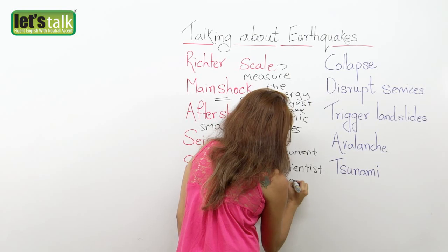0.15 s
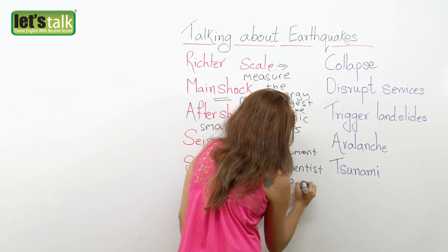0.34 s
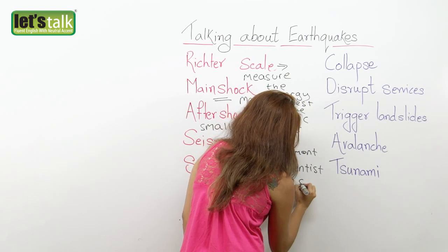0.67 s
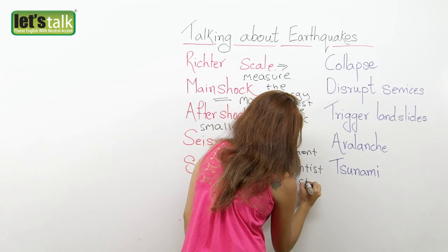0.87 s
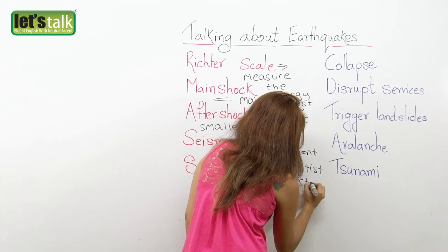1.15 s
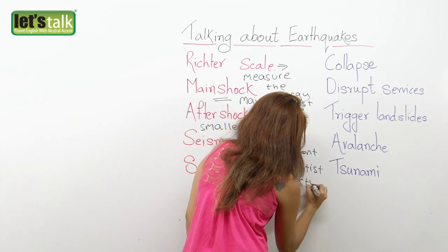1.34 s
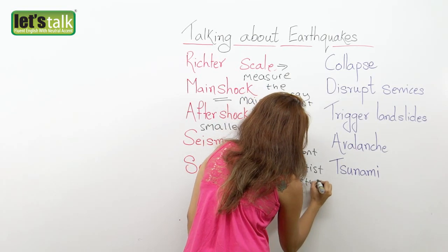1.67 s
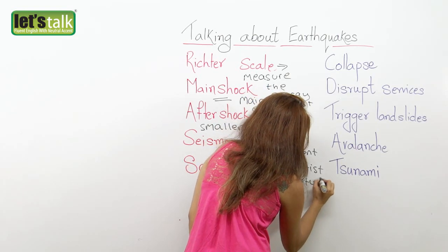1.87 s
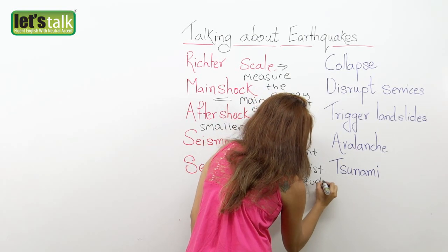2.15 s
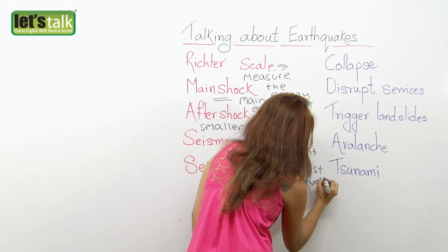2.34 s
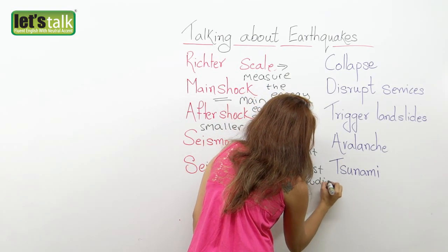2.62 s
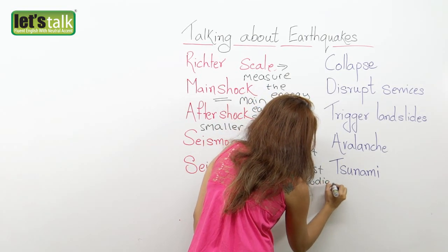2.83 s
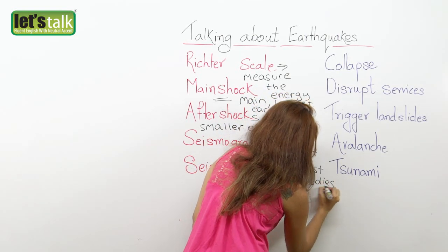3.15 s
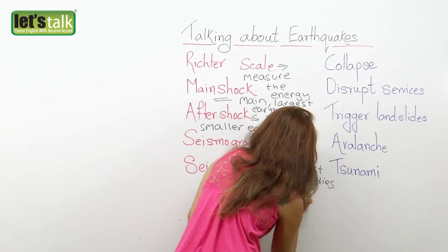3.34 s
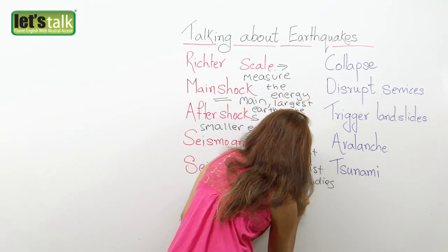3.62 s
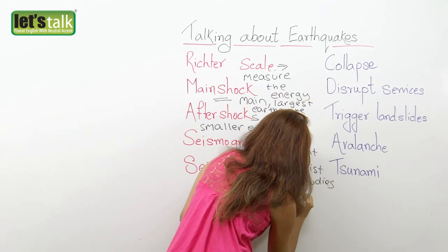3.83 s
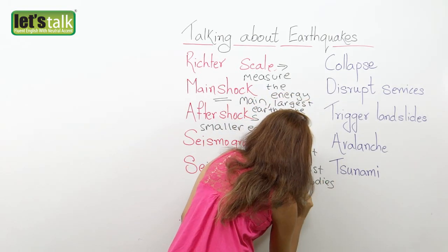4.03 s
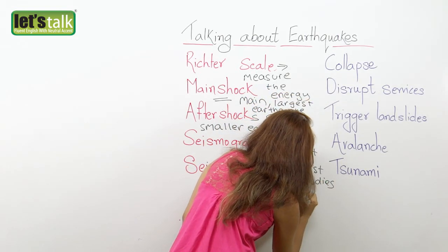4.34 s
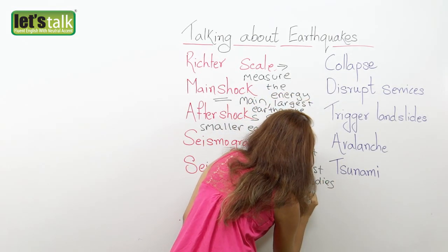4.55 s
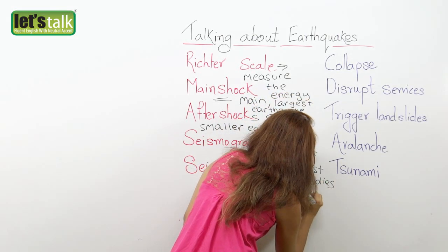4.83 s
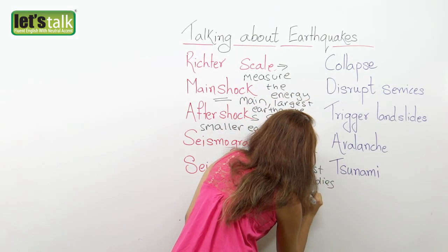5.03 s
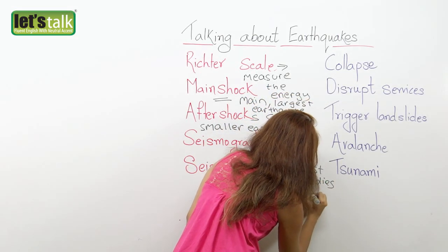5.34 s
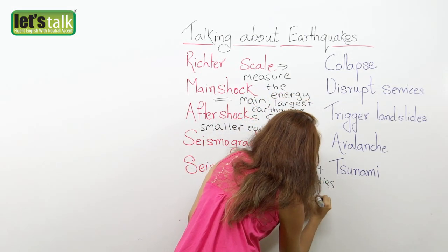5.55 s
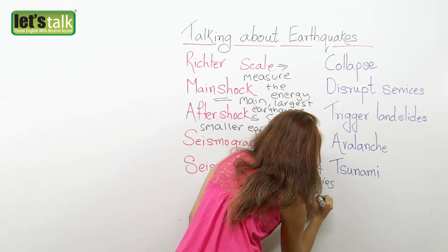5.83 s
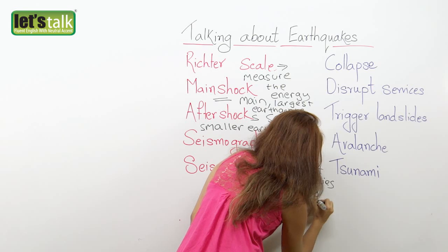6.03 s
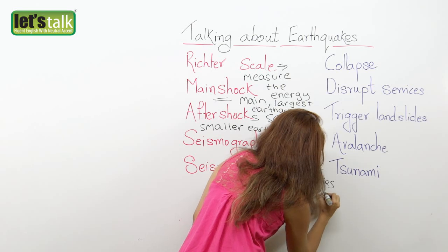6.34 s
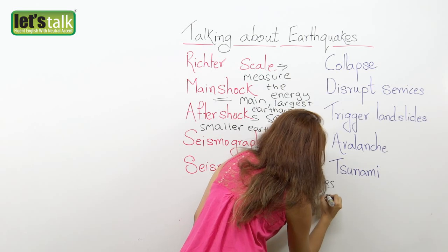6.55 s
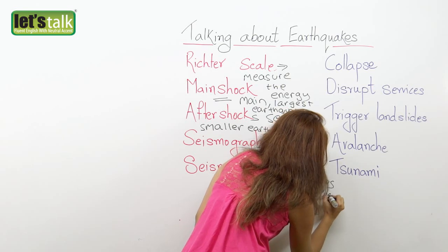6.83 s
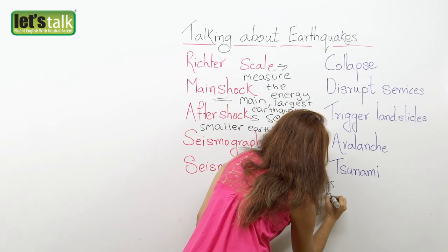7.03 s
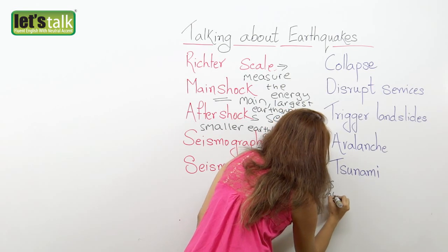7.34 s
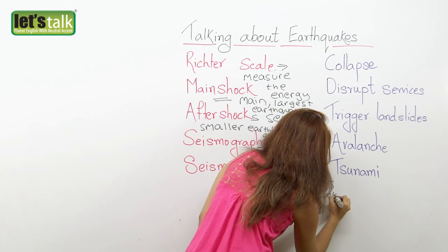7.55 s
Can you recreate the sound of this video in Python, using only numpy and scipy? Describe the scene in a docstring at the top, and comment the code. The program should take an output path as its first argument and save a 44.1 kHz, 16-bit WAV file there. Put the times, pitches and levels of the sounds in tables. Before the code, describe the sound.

A felt marker writes on a wall whiteboard in a quiet room, picked up by a clip-on microphone over low, soft room rumble and slight hiss. From 0 to 3.2 s, short dry high swishes, mostly about 0.1 to 0.2 s each, come in uneven groups; many begin with a soft hollow thump from the panel. Small hard ticks and faint crackle are close by, with brief cloth scuffs at 0.3 to 0.5 s and a brighter click at 0.83 s. Writing stops from 3.25 to 3.6 s, where the loudest sharp click hits at 3.28 s, followed by smaller ones and a low rub. Strokes resume at 3.6 s, one longer near 4.0 to 4.3 s, a crisp click at 4.56 s. A very faint distant horn holds from 5.5 to 5.9 s. Taps and swishes continue, with thin bright clicks around 6.9 and 7.3 s, until 7.7 s.

```python
"""A felt marker writes on a wall whiteboard in a quiet room, heard by a clip-on microphone.
Each landing of the tip is a force pulse ringing the board's modes; the felt's stroke is drifting bands of noise
and a low drag on the board. Clicks from something small and hard near the microphone are short decaying modes,
with faint ticks and pushes on the diaphragm. Cloth or hand scuffs are band noise; a far horn is a few harmonics."""
import sys
import numpy as np
from scipy import signal
from scipy.fft import rfft, irfft, next_fast_len
from scipy.io import wavfile
from scipy.ndimage import uniform_filter1d, map_coordinates

SR = 44100
rng = np.random.default_rng(int(sys.argv[2]) if len(sys.argv) > 2 else 0)


def store_pcm(level_fs):
    """Save levels as 16-bit WAV."""
    pcm = np.round(np.clip(level_fs, -1, 1) * 32767).astype(np.int16)
    wavfile.write(sys.argv[1], SR, np.atleast_2d(pcm).T)


N = 338716

# board modes: f/Hz, t60/s, strength (negative: tip drives the mode the other way)
BOARD_MODES = [(41.2, 0.059, 0.095), (48.5, 0.8, -0.0104), (69.4, 0.94, 0.025), (80.4, 0.41, 0.0437),
               (112.7, 0.58, 0.024), (131.2, 0.65, 0.0073), (152.7, 0.64, 0.0153), (186.3, 0.27, 0.015),
               (196.6, 0.25, 0.069), (206.2, 0.13, -0.1), (220.9, 0.22, -0.26), (248.8, 0.19, -0.11),
               (260.6, 0.18, -0.14), (273.7, 0.19, 0.046), (283.2, 0.22, -0.066), (324.4, 0.16, -0.12),
               (351.2, 0.23, -0.063), (377.6, 0.039, 0.38), (440, 0.32, 0.0163), (453.5, 0.11, 0.037),
               (511, 0.075, 0.032), (800, 0.024, -0.047)]
# clicks near the microphone: t/s, dull knock drive/dB, bright ring drive/dB, ring f/Hz
CLICK_EVENTS = [(0.1407, -33, -40, 5440), (0.337, -38, -43, 3500), (0.5641, -37, -47, 3300),
                (0.8264, -32.5, -22.5, 5600), (0.83, -36, -35, 5530), (0.867, -32.5, -50, 3500),
                (0.9374, -38, -46, 5500), (1.1835, -42, -50, 5000), (1.3739, -40.5, -37.5, 3540),
                (1.542, -46, -50, 3300), (1.5699, -39, -33.5, 3260), (2.0722, -41, -36, 2040),
                (2.1, -54, -34, 1210), (2.1715, -35, -39, 3500), (2.2183, -43, -46, 14500),
                (2.2447, -41.5, -44, 9000), (2.2606, -37.5, -36, 2100), (2.3994, -33.5, -37, 4900),
                (2.468, -42, -37, 1500), (2.6498, -40.5, -43, 4500), (2.711, -60, -34.5, 1310),
                (2.818, -45, -40, 1400), (2.865, -47, -37.5, 3240), (2.958, -46, -36.5, 1500),
                (3.1323, -37, -40, 5460), (3.227, -38.5, -34, 2100), (3.278, -15.5, -11, 4960),
                (3.2853, -24.5, -17.5, 5000), (3.3832, -30.5, -22, 7400), (3.4285, -26.5, -20, 10900),
                (3.4368, -36.5, -28, 9300), (3.4475, -55, -40, 8500), (3.6809, -39.5, -58, 5500),
                (3.71, -42, -46, 4500), (3.719, -35, -28.5, 5700), (3.735, -33.5, -27, 5700),
                (3.744, -45, -42, 5200), (3.7734, -33.5, -36, 4200), (3.7763, -36, -30, 6540),
                (3.905, -51, -49, 5200), (3.9694, -33, -27, 5100), (4.018, -39.5, -54, 3600),
                (4.167, -44, -39, 3480), (4.1967, -37, -28.5, 10900), (4.2083, -41, -49, 9000),
                (4.3105, -47, -43, 8000), (4.5564, -27, -17.5, 9300), (4.565, -39.5, -50, 6500),
                (4.667, -46, -31, 1210), (4.8015, -45.5, -50, 3300), (5.274, -42, -46, 4500),
                (5.3889, -39.5, -51, 11200), (5.5864, -40.5, -53, 3200), (6.127, -44, -45.5, 3170),
                (6.1834, -42, -32, 11100), (6.5411, -38, -40, 5530), (6.8682, -31.5, -25, 11000),
                (6.881, -43, -31, 11100), (6.8846, -38, -42, 11100), (6.991, -37, -45, 3500),
                (7.2672, -31.5, -23, 10700), (7.275, -40, -34, 11100), (7.2778, -38, -40, 11100),
                (7.3788, -28.5, -26.5, 4000), (7.3785, -31, -21, 11100), (7.4254, -36.5, -30, 10000)]


def amp(db):
    """Gain of a level in dB."""
    return 10 ** (np.asarray(db) / 20)


def unit(x):
    """x at rms 1."""
    return x / np.sqrt(np.mean(x ** 2) + 1e-20)


def wobble(rate_hz):
    """Smooth random curve, rate_hz knots per second."""
    knots = rng.standard_normal(int(N * rate_hz / SR) + 4)
    return map_coordinates(knots, [np.arange(N) * rate_hz / SR])


def filtered(x, response):
    """x times a response of frequency."""
    m = next_fast_len(N + SR // 2)
    return irfft(rfft(x, m) * response(np.fft.rfftfreq(m, 1 / SR)), m)[..., :N]


def noise(spectrum):
    """Noise of rms 1 coloured by (f/Hz, level/dB) points on a log axis."""
    f, db = np.transpose(spectrum)
    colour = lambda hz: amp(np.interp(np.log(hz + 1), np.log(f + 1), db))
    return unit(filtered(rng.standard_normal(N), colour))


def smooth_patches(shape, frames):
    """Random time-frequency pattern of rms 1, averaged over 3 bins and some frames."""
    over_bins = uniform_filter1d(rng.standard_normal(shape), size=3, axis=0)
    return unit(uniform_filter1d(over_bins, size=frames, axis=1))


def room():
    """Room tone and microphone hiss: steady coloured noise in slowly shifting patches."""
    # noise spectrum: f/Hz, relative density/dB per Hz
    room_spectrum = [(12, -57), (20, -17.5), (47, 7), (70, 2), (119, -3), (306, -6.5), (565, -13),
                     (1160, -13.5), (1920, -19), (2840, -26.5), (3260, -27.5), (4810, -32), (9660, -34.5),
                     (15100, -40), (15400, -72)]
    room_db, patch_db = -52, 1.9
    hz, t, z = signal.stft(noise(room_spectrum), SR, nperseg=1024)
    shifting = z * amp(patch_db * smooth_patches(z.shape, 5))
    return amp(room_db) * signal.istft(shifting, SR, nperseg=1024)[1][:N]


def strokes(t):
    """Relative gains of 3 felt bands and the low band's centre/Hz at t: quick start, mid swell, softer stop."""
    # felt strokes: start/s, end/s, mid-stroke low band f/Hz (tip tilt), relative low, middle, high band level/dB
    stroke_events = [(0.0, 0.16, 7340, -64.5, -65, -75), (0.136, 0.24, 7650, -59.5, -67, -65),
                     (0.223, 0.308, 7300, -64, -63, -69), (0.377, 0.46, 6640, -72, -75, -81.0),
                     (0.47, 0.601, 7300, -58.5, -63, -71), (0.585, 0.698, 7240, -64.5, -68, -68),
                     (0.688, 0.771, 7600, -61.5, -60.5, -64), (0.92, 1.06, 7150, -66.5, -67.5, -68),
                     (1.171, 1.235, 7600, -59, -63, -66), (1.359, 1.565, 7450, -64, -66, -69.5),
                     (1.69, 1.834, 7900, -62.5, -63.5, -72), (1.812, 1.927, 7800, -64, -65.5, -72.5),
                     (1.905, 2.0, 7000, -68, -64.5, -71), (2.001, 2.109, 7300, -66, -62, -70),
                     (2.231, 2.32, 7360, -69.5, -67, -75), (2.592, 2.712, 8350, -67, -63.5, -71),
                     (2.69, 2.875, 8100, -66, -64, -69), (2.968, 3.079, 8440, -69, -64.5, -75.0),
                     (3.066, 3.166, 8250, -66, -63, -66), (3.15, 3.235, 8600, -58, -58, -64),
                     (3.588, 3.708, 7960, -63.5, -69, -69), (3.688, 3.881, 7500, -61, -60.5, -64),
                     (3.993, 4.275, 7360, -63, -63.5, -65.5), (4.286, 4.382, 7100, -63, -65.5, -65.5),
                     (4.491, 4.569, 7300, -62.5, -67, -67.5), (4.591, 4.766, 7000, -64, -64.5, -67),
                     (4.88, 5.01, 7300, -62, -68.5, -68.0), (5.119, 5.184, 7410, -60, -62, -67),
                     (5.294, 5.404, 7200, -64.5, -68.5, -70), (5.413, 5.596, 7580, -62.5, -65.5, -69),
                     (5.721, 5.864, 7850, -62, -65.5, -69), (5.84, 5.997, 7800, -62.5, -69, -67.5),
                     (6.011, 6.135, 7750, -63.5, -65.5, -66.0), (6.135, 6.254, 8270, -60, -67, -63),
                     (6.481, 6.588, 7900, -65, -69, -71), (6.56, 6.69, 8100, -65, -71, -67.0),
                     (6.856, 6.964, 8270, -62.5, -65, -68), (6.936, 7.095, 8000, -63.5, -67.5, -70),
                     (7.104, 7.198, 7600, -63.5, -70, -68), (7.31, 7.408, 8100, -65, -70, -69),
                     (7.413, 7.526, 8300, -61, -68, -64), (7.616, 7.706, 7800, -60.5, -68.5, -66)]
    touch_s, lift_s, arch_db = 0.018, 0.03, 3.5  # the tip is fastest mid-stroke
    rise_hz = 920  # low band climb, start to end of stroke
    gains = np.zeros((3, len(t)))
    centre_hz = np.full(len(t), float(stroke_events[0][2]))
    for start, end, low_hz, *dbs in stroke_events:
        edge = np.clip(np.minimum((t - start) / touch_s, (end - t) / lift_s), 0, 1)
        along = np.clip((t - start) / (end - start), 0, 1)
        gains += edge * amp(np.array(dbs)[:, None] + arch_db * np.sin(np.pi * along))
        begun = t >= start
        centre_hz[begun] = low_hz + rise_hz * (along[begun] - .5)
    return gains, centre_hz


def felt():
    """Fibres slip on the enamel: dense noise in bands that drift with the tilt of the tip."""
    # middle and high band: f/Hz, half width/Hz
    upper_bands = [(9700, 1060), (13250, 1900)]
    # weaker side bands: f/Hz, half width/Hz, level re low and middle bands/dB
    side_bands = [(3354, 510, -6), (4530, 530, -11), (6030, 1140, -9.5), (15000, 600, -17)]
    low_width_hz = 1150  # half width
    patch_db, grain_db, felt_db, top_hz = 2.63, 1.56, 8.5, 15700
    hz, t, z = signal.stft(rng.standard_normal(N), SR, nperseg=256)
    (low, *upper), centre_hz = strokes(t)
    frame_index = np.minimum(t * SR, N - 1).astype(int)

    def drift():
        return 1 + 0.013 * wobble(11)[frame_index]

    def swell():  # drawn anew for each band as the tip turns
        return (drift() ** 6).clip(0, 3)

    def band(mid_hz, width_hz):
        return 1 / (1 + ((hz[:, None] - mid_hz) / width_hz) ** 4)

    power = (low * swell() * band(centre_hz * drift(), low_width_hz)) ** 2
    for gain, (mid_hz, width_hz) in zip(upper, upper_bands):
        power = power + (gain * swell() * band(mid_hz * drift(), width_hz)) ** 2
    for mid_hz, width_hz, db in side_bands:
        side_gain = np.hypot(low, upper[0]) * amp(db)
        power = power + (side_gain * swell() * band(mid_hz, width_hz)) ** 2
    patches = amp(patch_db * smooth_patches(z.shape, 18))
    hiss = signal.istft(z * np.sqrt(power) * patches, SR, nperseg=256)[1][:N]
    grain = amp(grain_db * wobble(300))  # uneven fibres
    return amp(felt_db) * grain * filtered(hiss, lambda f: f < top_hz)


def board(force, spot_db=0):
    """The panel radiates each mode's velocity; spot_db (per mode) is how the touched place favours modes."""
    t = np.arange(SR // 2) / SR
    hz, t60, strength = np.transpose(BOARD_MODES)[:, :, None]
    ring = strength * amp(spot_db - 60 * t / t60) * np.cos(2 * np.pi * hz * t)
    return signal.fftconvolve(force, ring.sum(0))


def drag():
    """Unsteady force of the sliding tip, following the low felt band; it shakes the panel."""
    step = 64  # samples
    pressure = strokes(np.arange(0, N, step) / SR)[0][0].repeat(step)[:N]
    unsteady = amp(-37.0 + 2.4 * wobble(12))
    return unsteady * pressure * noise([(20, -24.0), (90, 6.0), (300, -43.0), (1000, -26), (20000, -72)])


def taps():
    """Soft felt gives a smooth push: a softer landing lasts longer, so it thumps duller."""
    # tip landings: t/s, force level/dB
    landings = [(0.0159, -6.5), (0.4846, -8), (0.9052, -7.5), (1.1514, -6.5), (1.3409, -10),
                (1.6964, -10.5), (2.2211, -7), (2.4286, -8), (2.5699, -16), (2.9724, -5), (3.5844, -10.5),
                (3.997, -9.5), (4.4778, -8), (4.8719, -6.5), (5.1027, -7), (5.2768, -10.5), (5.7226, -7.5),
                (6.4695, -9), (6.8213, -8), (7.3135, -8.5), (7.606, -13)]
    # written lines, left to right: start/s, end/s
    line_times = [(0, 3), (3.58, 7.4)]
    # mode strength change from one end of a line to the other: f/Hz, change/dB
    line_tilt = [(190, -2), (222, -1.4), (300, 3), (450, -1)]
    firm_db, firm_contact_ms = -6.5, 0.94
    softening = 1.42  # dB of contact length per dB softer
    soft_hz = 1130  # felt cushions the landing above this
    out = np.zeros(N + SR)
    spots_db = .8 * rng.standard_normal((len(landings), len(BOARD_MODES), 1))
    tilt_db = np.interp(np.transpose(BOARD_MODES)[0], *np.transpose(line_tilt))[:, None]
    for (s, db), spot_db in zip(landings, spots_db):
        contact_ms = firm_contact_ms * amp(softening * (firm_db - db))
        push = np.hanning(max(round(contact_ms * SR / 1000), 8))
        start, end = max(line for line in line_times if line[0] <= s)
        along = (s - start) / (end - start)
        thump = board(push / push.sum(), spot_db + tilt_db * (along - .5))
        out[round(s * SR) - len(push) // 2:][:len(thump)] += amp(db) * thump
    return filtered(out[:N], lambda hz: 1 / (1 + (hz / soft_hz) ** 6))


def crackle(rate_hz=60):
    """Faint ticks: short decaying sines scattered in time, pitch and size."""
    count = int(rate_hz * N / SR)
    when, pitch, size = rng.random((count, 3)).T
    resonance_hz = np.where(pitch < .8, 1400, 3300)  # two small resonances
    hz = resonance_hz * (1 + 0.33 * rng.standard_normal(count))
    t = np.arange(300) / SR
    tick_db = -49.5 - 3.6 * np.log(size + 0.0076)[:, None] - 60 * t / 0.0037
    ticks = amp(tick_db) * np.sin(2 * np.pi * hz[:, None] * t)
    index = (when * N).astype(int)[:, None] + np.arange(len(t))
    return np.bincount(index.ravel(), ticks.ravel(), N + len(t))[:N]


def clicks():
    """Short modes at slightly new strengths and pitch each time, then a faint answer from the walls."""
    # modes of what clicks: f/Hz, relative level/dB, t60/s
    click_modes = [(870, 7, 0.0029), (1613, 4.5, 0.0047), (2016, -5, 0.012), (3290, 8, 0.0052),
                   (3830, 1, 0.0052), (4460, 1, 0.0042), (5110, 2.5, 0.0047), (6690, 6.5, 0.0024),
                   (7480, -15.5, 0.014), (9900, -17, 0.0073), (11360, 4.5, 0.0035), (13900, -1, 0.0018)]
    knock_hz, knock_db_per_octave = 2160, 6.5  # the knock dulls above this corner
    ring_octaves = 0.34  # reach of the ring
    rise_s, walls_t60_s, walls_db = 0.00016, 0.068, -23
    out, t = np.zeros(N + SR), np.arange(SR // 20) / SR
    hz, level_db, t60 = np.transpose(click_modes)[:, :, None]
    chance = rng.standard_normal((len(CLICK_EVENTS), 3, len(click_modes), 1))
    for (s, knock_db, ring_db, ring_hz), (spread_db, turn, detune) in zip(CLICK_EVENTS, chance):
        knock = amp(knock_db - knock_db_per_octave * np.log2(hz / knock_hz).clip(0))
        bright = amp(ring_db) * np.exp(-(np.log2(hz / ring_hz) / ring_octaves) ** 2 / 2)
        drive = np.hypot(knock, bright)
        phase = 2 * np.pi * hz * (1 + .015 * detune) * t + .3 * turn
        ring = amp(-60 * t / t60) * np.sin(phase)
        modes = (drive * amp(level_db + spread_db) * ring).sum(0)
        out[round(s * SR):][:len(t)] += modes * (1 - np.exp(-(t / rise_s) ** 2))
    t = np.arange(SR // 4) / SR
    walls = amp(-60 * t / walls_t60_s) * rng.standard_normal(len(t)) * (t > .002)
    return out[:N] + amp(walls_db) * signal.fftconvolve(out, walls / np.linalg.norm(walls))[:N]


def nudges():
    """Each click also pushes the diaphragm into a damped swing, growing faster than the click's drive."""
    nudge_db, nudge_at_db = -31.5, -16.5  # push for a click driven at nudge_at_db
    nudge_growth = 1.24  # dB per dB
    swing_hz, swing_t60_s, rise_s = 32, 0.064, 0.00042
    out, t = np.zeros(N + SR), np.arange(SR // 10) / SR
    swing = amp(-60 * t / swing_t60_s) * np.cos(2 * np.pi * swing_hz * t) * (1 - np.exp(-t / rise_s))
    for s, knock_db, ring_db, _ in CLICK_EVENTS:
        peak_db = max(knock_db, ring_db)
        out[round(s * SR):][:len(t)] += amp(nudge_db + nudge_growth * (peak_db - nudge_at_db)) * swing
    return out[:N]


def scuffs():
    """Cloth or hand rubs near the microphone: gritty band noise that starts at once, sags and lets go."""
    # scuffs: t/s, length/s, nominal level/dB, centre f/Hz, half width/Hz
    scuff_events = [(0.296, 0.021, -35.5, 320, 180), (0.34, 0.07, -41, 271, 256),
                    (0.347, 0.0073, -39.5, 700, 500), (0.485, 0.045, -41, 1310, 810),
                    (1.531, 0.05, -47.5, 256, 150), (3.364, 0.062, -41.5, 137, 60),
                    (3.443, 0.019, -48, 1010, 500)]
    sag_db, t60_s = 6, 0.098  # fall while it lasts; dying away after
    rise_s, grit_db = 0.00069, 2.2
    out, t = np.zeros(N + SR), np.arange(SR // 2) / SR
    hz = np.fft.rfftfreq(len(t), 1 / SR)
    for s, length_s, db, centre_hz, width_hz in scuff_events:
        band = 1 / (1 + ((hz - centre_hz) / width_hz) ** 2)
        rub = unit(irfft(rfft(rng.standard_normal(len(t))) * band, len(t)))
        fall_db = sag_db * np.minimum(t / length_s, 1) + 60 * (t - length_s).clip(0) / t60_s
        out[round(s * SR):][:len(t)] += amp(db - fall_db) * (1 - np.exp(-t / rise_s)) * rub
    return amp(grit_db * wobble(150)) * out[:N]


def horn():
    """Far horn: a fixed pitch with its overtones at random phases, faded in and out."""
    # harmonics: order, relative level/dB
    harmonics = [(1, 7), (5, -5.5), (6, -7), (10, -8)]
    pitch_hz, start_s, end_s, fade_s, horn_db = 196, 5.51, 5.87, 0.055, -57.5
    t = np.arange(N) / SR
    tone = sum(amp(db) * np.sin(2 * np.pi * (k * pitch_hz * t + rng.random())) for k, db in harmonics)
    held = np.clip(np.minimum(t - start_s, end_s - t) / fade_s, 0, 1)
    return amp(horn_db) * held * unit(tone)


def shadow(hz):
    """A reflection off the wearer partly cancels one band of the near clicks."""
    centre_hz, width_hz, depth = 2686, 800, 0.67
    return 1 - depth * width_hz / (width_hz + 1j * (hz - centre_hz))


def scene():
    """All sources at the one microphone."""
    near = filtered(clicks() + crackle(), shadow) + nudges() + scuffs()
    writing = taps() + board(drag())[:N] + felt()
    return (writing + near + horn() + room())[None]


def record(dry):
    """Nothing passes above the band limit."""
    top_hz = 16800
    return filtered(dry, lambda hz: hz < top_hz)


dry = scene()
out = record(dry)
store_pcm(out)
```